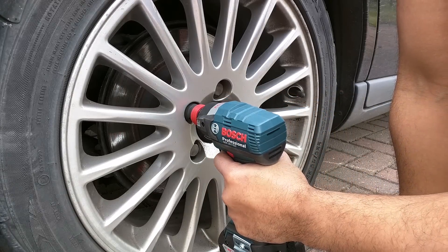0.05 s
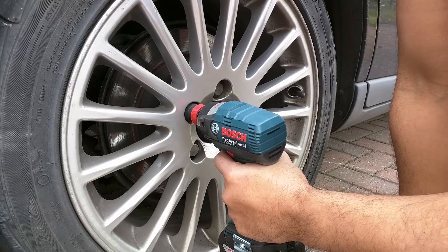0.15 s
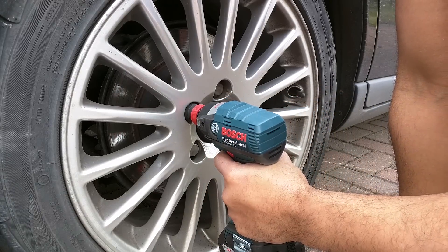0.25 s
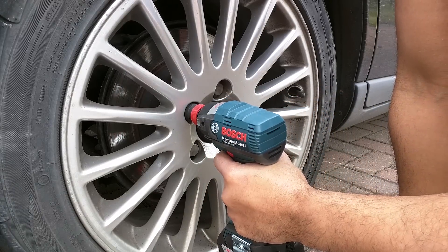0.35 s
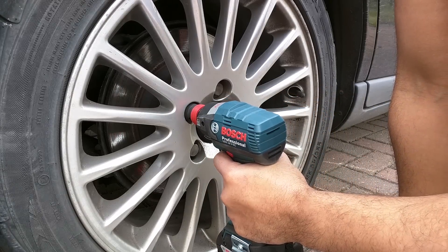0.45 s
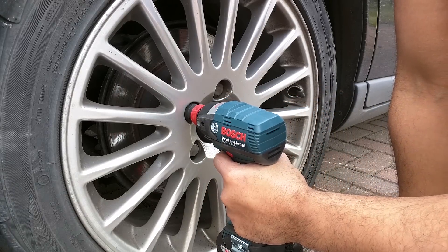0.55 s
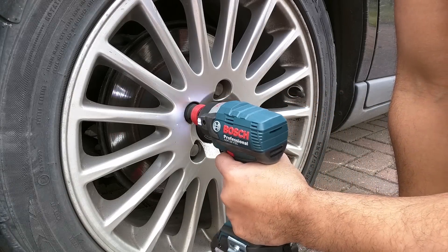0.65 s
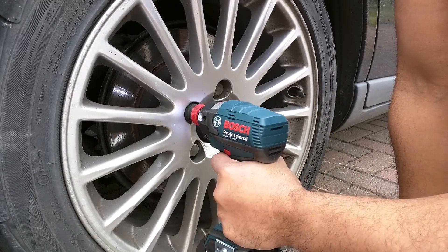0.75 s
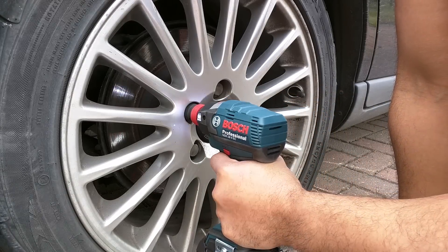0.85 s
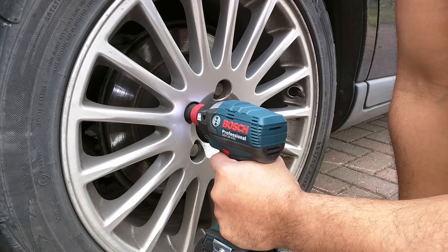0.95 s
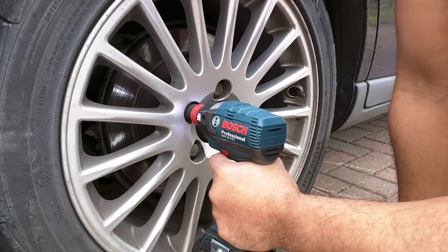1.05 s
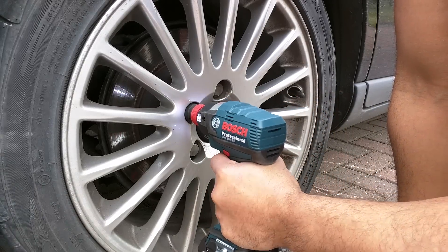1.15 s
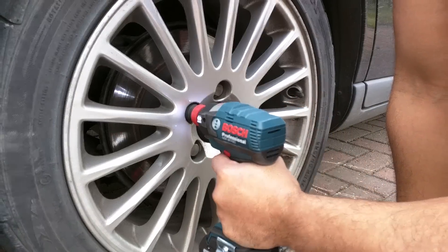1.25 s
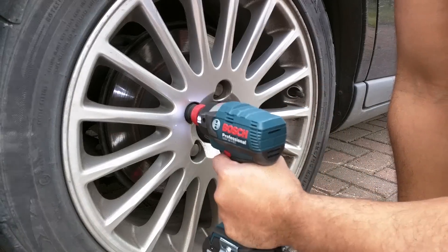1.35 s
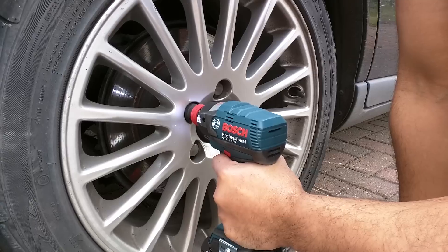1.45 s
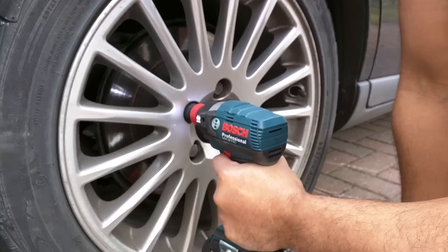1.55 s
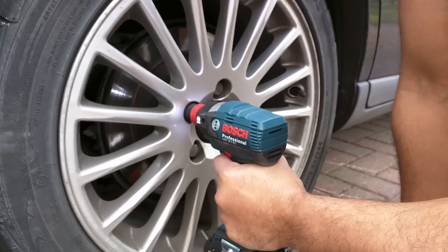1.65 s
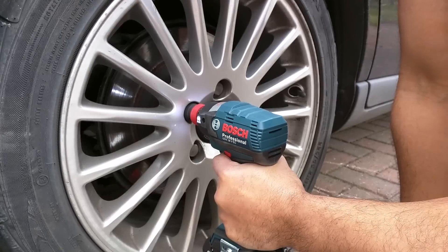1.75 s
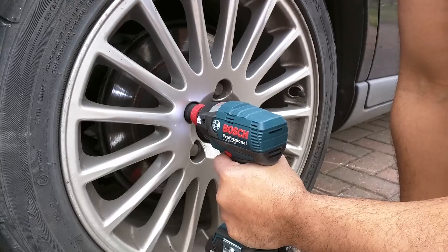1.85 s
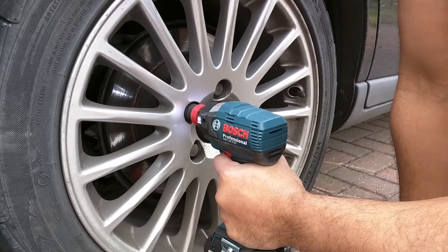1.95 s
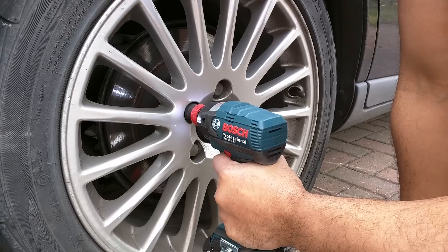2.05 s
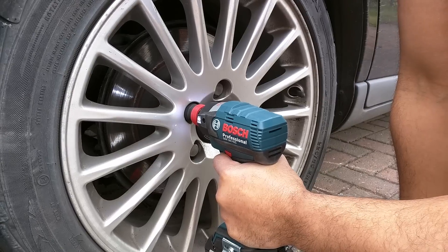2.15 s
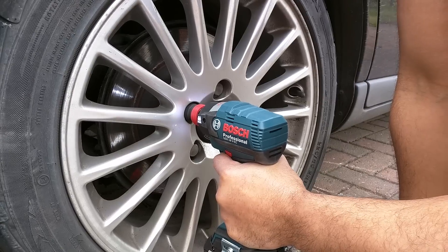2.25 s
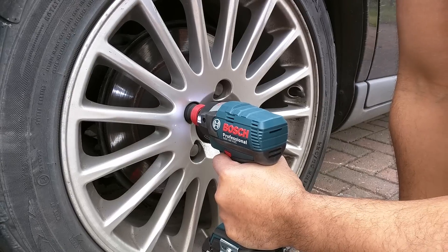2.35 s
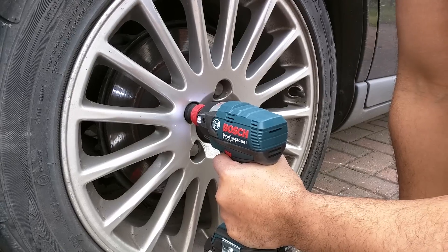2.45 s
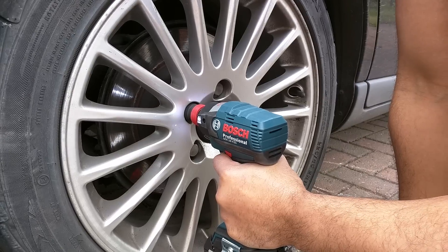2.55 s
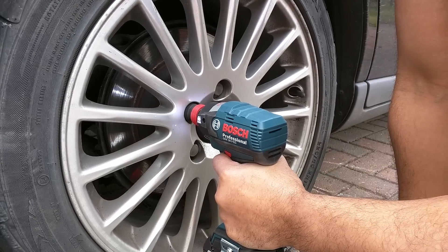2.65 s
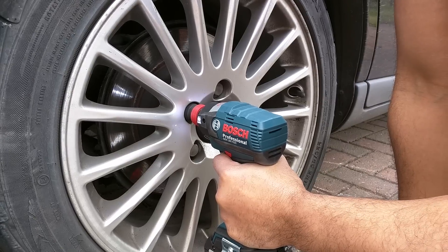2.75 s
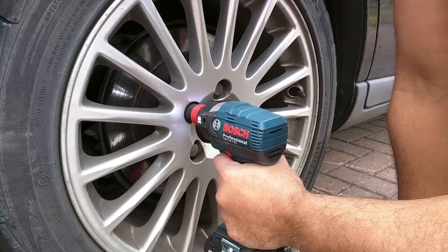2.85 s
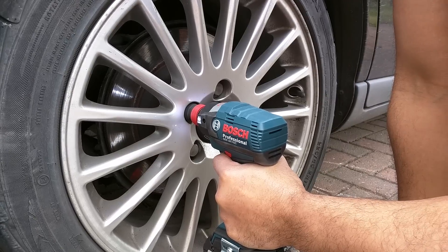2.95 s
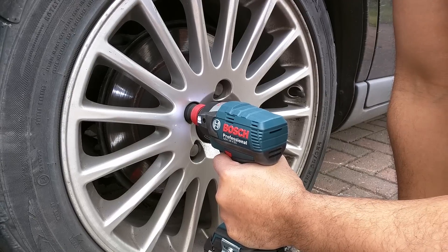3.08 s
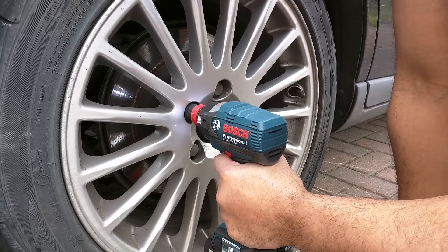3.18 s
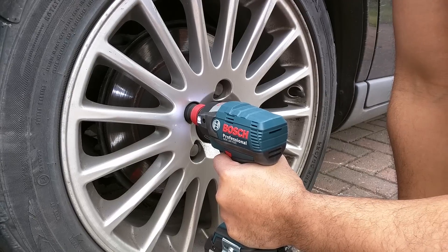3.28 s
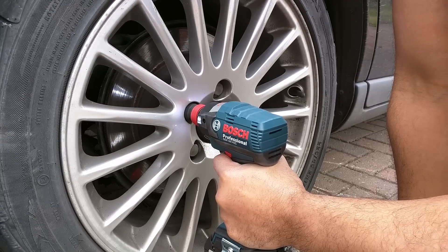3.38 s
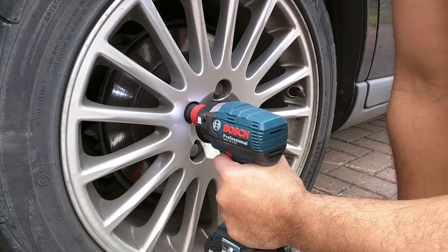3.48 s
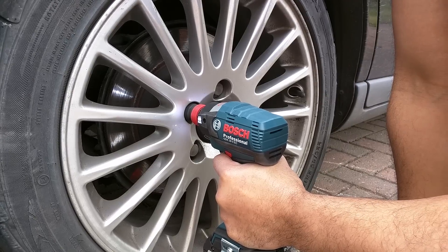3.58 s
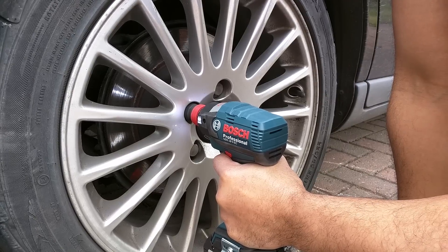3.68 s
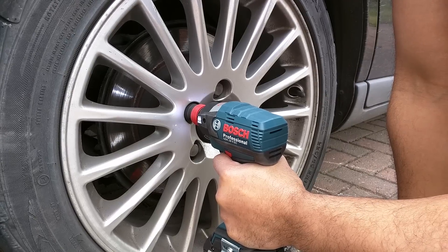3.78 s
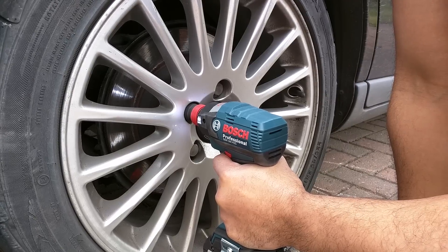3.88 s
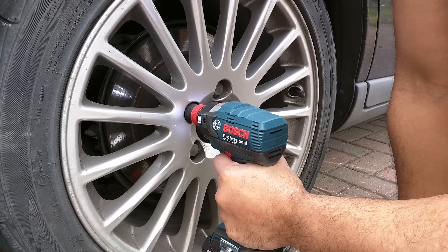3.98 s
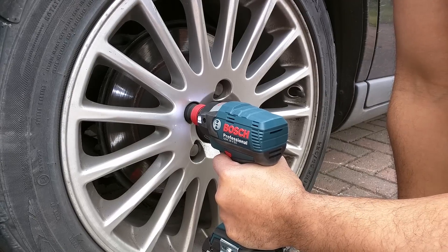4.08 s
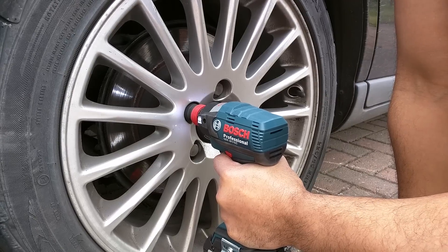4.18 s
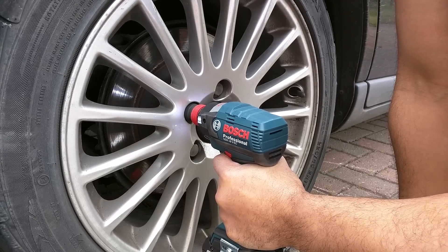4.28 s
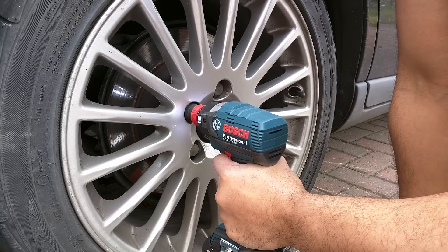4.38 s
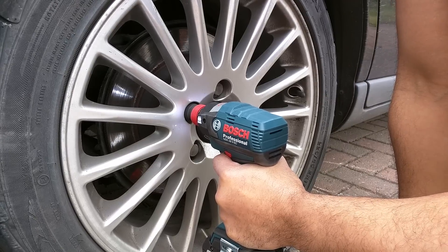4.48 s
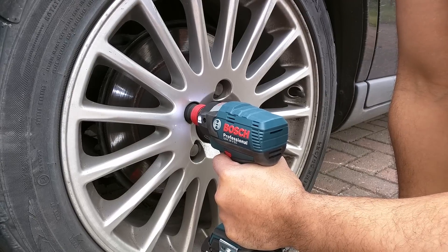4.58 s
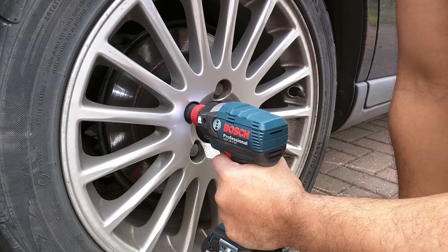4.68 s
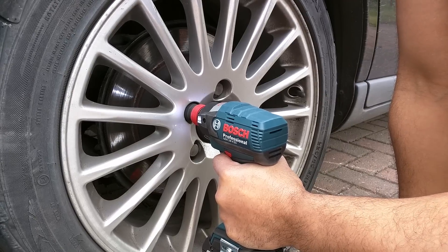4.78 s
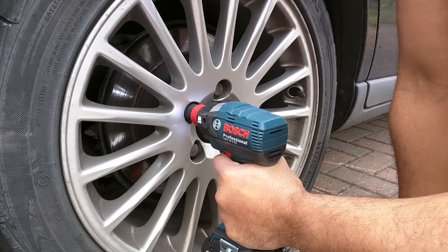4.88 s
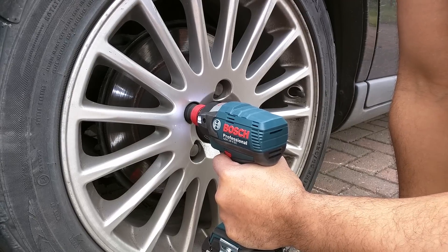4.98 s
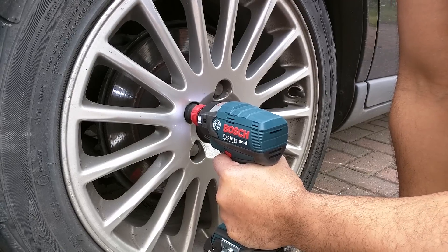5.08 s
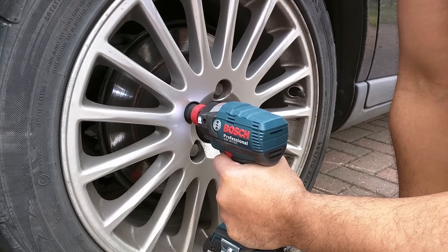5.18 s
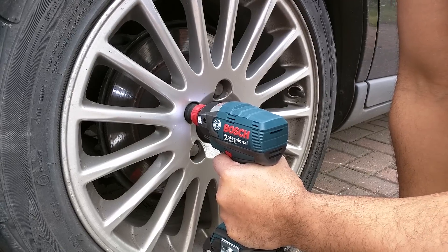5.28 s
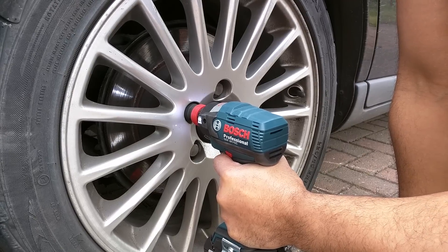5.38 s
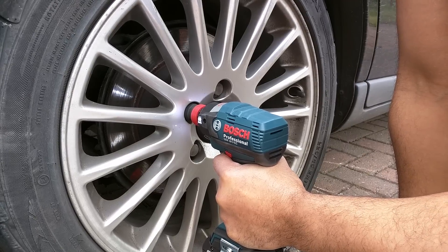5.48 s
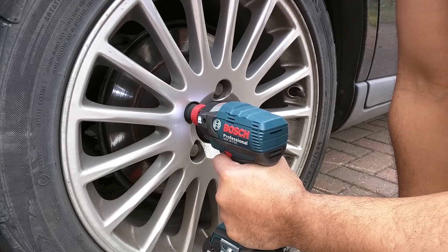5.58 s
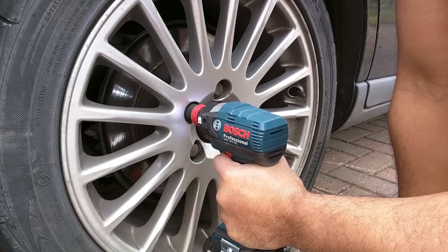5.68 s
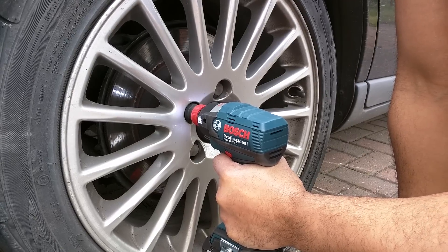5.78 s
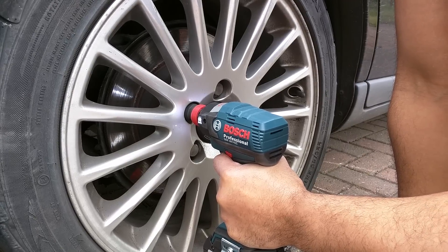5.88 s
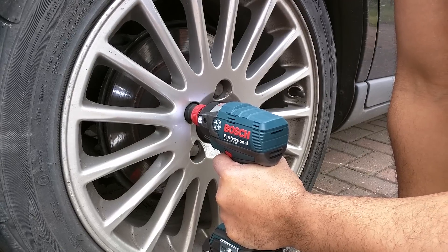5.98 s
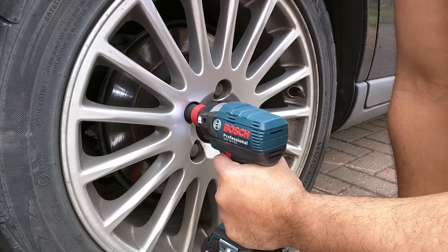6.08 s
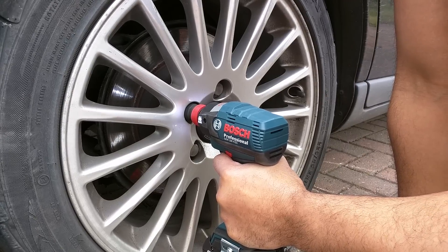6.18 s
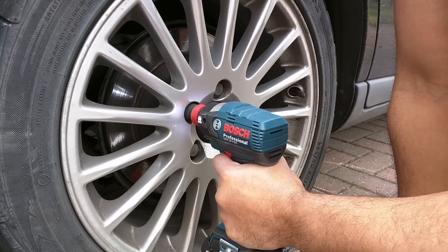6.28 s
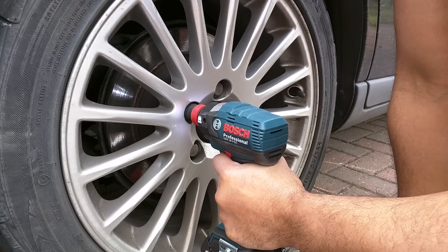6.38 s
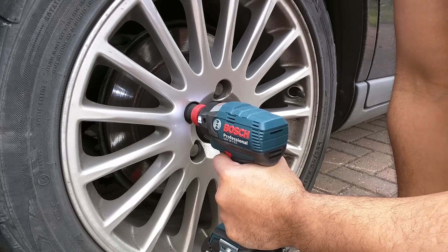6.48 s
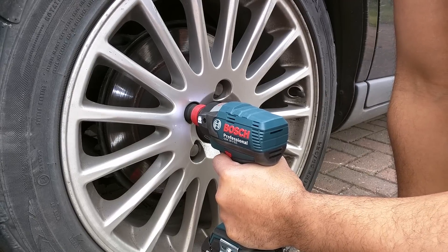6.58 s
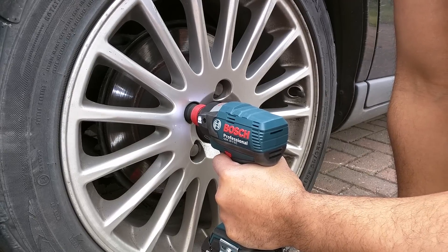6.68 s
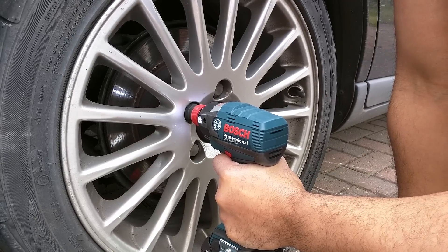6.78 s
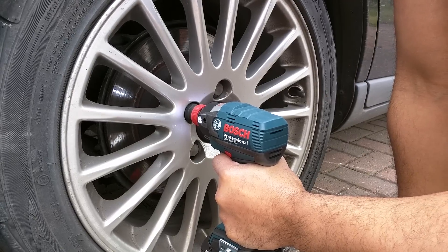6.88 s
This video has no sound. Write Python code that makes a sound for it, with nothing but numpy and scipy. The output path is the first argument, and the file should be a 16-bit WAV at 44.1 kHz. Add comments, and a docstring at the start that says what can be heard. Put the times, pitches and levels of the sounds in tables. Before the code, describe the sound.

A cordless impact wrench works on a stubborn car wheel bolt outdoors, heard from close by. First there is only a low gust of wind and a few very faint, thin whistles. The socket knocks as the motor engages, and rapid steel-on-steel hammering takes over, harsh and ringing. It holds steady to the end, with only slight shifts in tone.

```python
"""A cordless impact wrench hammers on a tight wheel bolt of a car, outdoors, close to the microphone.
The motor whirrs and the socket takes up its slack; then two hammer jaws hit the anvil in turn, about
68 blows a second. Each blow clashes in the socket, rings tool and alloy wheel and kicks the tool's body.
Wind rumbles on the microphone over soft distant noise, and a few faint thin whistles and a rustle
sound before the trigger is pulled."""
import sys
import numpy as np
from scipy import signal
from scipy.fft import rfft, irfft
from scipy.io import wavfile
from scipy.ndimage import uniform_filter1d

SR = 44100
rng = np.random.default_rng(int(sys.argv[2]) if len(sys.argv) > 2 else 0)


def unload_audio(sound):
    """Save the sound as a 16-bit wav file, at the path given as the first command line argument."""
    columns = np.transpose(np.atleast_2d(sound))
    # keep every value between -1 and 1, then stretch to whole-number steps
    steps = np.round(np.clip(columns, -1, 1) * 32767)
    wavfile.write(sys.argv[1], SR, steps.astype(np.int16))


N = 306054
TIME = np.arange(N) / SR
FFT_SIZE = 8192
BIN_HZ = np.maximum(np.arange(FFT_SIZE // 2 + 1) * SR / FFT_SIZE, 1)
HAMMER_START_S = .8105

# A small click as the trigger is pulled, then knocks as the drive engages and the socket takes up its slack. #
# Each row: start in seconds, relative level of the ring in dB, relative level of the dull knock in dB.
SLACK_KNOCKS = [(.7712, -18, -26), (.7872, 1, 0), (.7902, -.5, 0), (.8022, -3, 1)]


def wrench(jaw_share=.12, creep_db=-12.0, scrape_db=-13.0, scrape_lead_s=.0012, pressure_db=.25):
    """Close up, each blow sets off a repeating ring and a changing rattle through the same resonances."""
    # Broad colour of a blow. Each row: frequency in Hz, relative level in dB.
    blow_colour = [(130.0, -7.1), (330.0, -14.0), (550.0, -13.2), (1000.0, -7.0), (2050.0, -9.7),
                   (2900.0, -7.6), (4200.0, -6.4), (6500.0, -8.2), (8000.0, -5.3), (10500.0, 0.0),
                   (13000.0, -3.1), (15500.0, -5.4)]
    # Resonances of housing, wheel, socket and anvil. Each row: centre in Hz, width in Hz, height in dB.
    resonances = [(424, 120, 4.5), (702, 160, 5.3), (895, 57, 2.5), (1192, 80, 11), (1312, 100, 11),
                  (1444, 100, 9.3), (1871, 132, 2.3), (2245, 83, 3.5), (2492, 160, 7), (2654, 55, 7),
                  (2730, 90, 3.5), (3200, 130, 7.5), (3355, 85, 9), (3570, 463, 6.5), (4297, 40, 5),
                  (4700, 330, 4), (4791, 80, 5), (5076, 166, 2.5), (5764, 283, 3.5), (7243, 165, 3),
                  (7778, 45, 4), (8609, 130, 4.5), (9700, 300, 1.5), (9843, 60, 4.5), (10544, 130, 4),
                  (11130, 100, 4.5), (11510, 130, 3.5), (11680, 120, 2.5), (12272, 200, 2.2),
                  (13440, 220, 2.8)]
    # Share of the sound that changes from blow to blow. Each row: frequency in Hz, share in dB.
    looseness = [(130, -.6), (400, -1), (800, -4.2), (1300, -5.3), (3300, -6), (6000, -3.8), (11000, -2.6)]
    # Ringing parts: housing, wheel, socket, hammer and anvil. Each row: low and high edge in Hz,
    # level in dB, rise and decay in seconds, tail level in dB, tail decay in seconds,
    # dB gained per dB of jaw fullness.
    ringing_parts = [(170, 560, -44, .0015, .004, -16, .015, .9),
                     (560, 1750, -27.3, .001, .013, -7, .02, .3),
                     (1750, 6200, -21.5, .00012, .0043, -9.5, .015, 1.0),
                     (6200, 19000, -15.35, .00015, .0034, -18.5, .018, -.55)]
    times, jaw, fullness_db, strength = blows(jitter_s=.00008, lead_s_per_db=.00011, uneven_db=.42)
    slack_s, slack_db, _ = np.transpose(SLACK_KNOCKS)
    slack = clicks(slack_s, from_db(slack_db))
    loose_db = np.minimum(spectrum(looseness), -.1)
    firm_db = 10 * np.log10(1 - from_db(loose_db) ** 2)   # the rest of the power
    peaks_db = sum(db * .5 ** ((2 * (BIN_HZ - hz) / width) ** 2) for hz, width, db in resonances)
    body_db = spectrum(blow_colour) + peaks_db
    # the jaw scrapes onto the anvil just before it lands
    scrape_s = times - scrape_lead_s * rng.exponential(1, len(times))
    metal = 0
    for low, high, level_db, rise_s, decay_s, tail_db, tail_s, tilt in ringing_parts:
        envelope = blow_envelope(rise_s, decay_s, tail_db, tail_s)
        sizes = strength * from_db(tilt * fullness_db)
        hits = clicks(times, sizes) + slack
        # the two jaws share most of their ring; the rest swaps sign from one to the other
        alternating = clicks(times, sizes * (1 - 2 * jaw))
        firm = np.sqrt(1 - jaw_share) * convolve(hits, metal_ring(envelope))
        firm += np.sqrt(jaw_share) * convolve(alternating, metal_ring(envelope))
        # the ring shifts a little as the socket creeps on the bolt
        firm += from_db(creep_db) * drift(1.6) * convolve(hits, metal_ring(envelope))
        loose = rattle(hits + clicks(scrape_s, from_db(scrape_db) * sizes), envelope)
        band_db = body_db - 10 * np.log10((1 + (low / BIN_HZ) ** 10) * (1 + (BIN_HZ / high) ** 10))
        part = colour(firm, band_db + firm_db) + colour(loose, band_db + loose_db)
        metal += from_db(level_db) * unit_rms(part)
    _, clank_db, high_ring_db = socket_seat()
    metal = lift_band(metal, [3100, 3700], clank_db)
    metal = lift_band(metal, [8200, 9900], high_ring_db)
    # the hammer lands a little harder or softer as the hand's pressure wavers
    return from_db(pressure_db * drift(2.0)) * metal


def blows(jitter_s, lead_s_per_db, uneven_db):
    """The jaws land in turn, one fuller and earlier: times, jaw (0 or 1), fullness in dB, strength."""
    count, hammering = blow_count(), TIME >= HAMMER_START_S
    number = np.arange(int(count[-1]) + 1)
    times = np.interp(number, count[hammering], TIME[hammering])
    jaw = number % 2
    lean_db, clank_db, _ = (np.interp(times, TIME, db) for db in socket_seat())
    limp_db = lean_db * (1 - 2 * jaw)
    fullness_db = .25 * clank_db + limp_db   # the whole blow follows the clank a little
    timing, force = rng.standard_normal((len(times), 2)).T
    landing_s = times - lead_s_per_db * limp_db + jitter_s * timing
    return landing_s, jaw, fullness_db, from_db(uneven_db * force)


def blow_count(start_hz=67.814, top_hz=69.385, loaded_hz=66.814, at_speed_s=1.05, sag_s=5.0):
    """Running count of blows: the motor comes up to speed, then slowly sags under the load."""
    rise = np.interp(TIME, [HAMMER_START_S, at_speed_s], [start_hz, top_hz])
    sag = (top_hz - loaded_hz) * (1 - np.exp(-np.maximum(TIME - at_speed_s, 0) / sag_s))
    return np.cumsum((rise - sag) * (TIME >= HAMMER_START_S)) / SR


def socket_seat(shift_s=.3):
    """Jaw lean, clank and high ring in dB: each slides to a new value as the socket shifts on the bolt."""
    # Seats of the socket. Each row: middle of the shift in seconds, first jaw's fullness over the mean
    # in dB, lift of the clank in dB, lift of the high ring in dB.
    seats = [(1.0, .7, 1.5, .3), (2.55, -1.3, -.2, -.4), (4.7, -.4, -.3, -.2), (5.95, -.6, -.4, 1.8)]
    rows = np.array(seats)
    steps_db = np.diff(rows[:, 1:], axis=0, prepend=0)
    progress = np.clip((TIME - rows[:, :1]) / shift_s + .5, 0, 1)
    return steps_db.T @ progress


def blow_envelope(rise_s, decay_s, tail_db, tail_s):
    """One blow dies away, with a weak tail off wheel arch and paving; energy 1."""
    t = TIME[:SR // 16]
    decay = np.hypot(np.exp(-t / decay_s), from_db(tail_db) * np.exp(-t / tail_s))
    envelope = (1 - np.exp(-t / rise_s)) * decay
    return envelope / np.linalg.norm(envelope)


def metal_ring(envelope, passes=8):
    """A blow scatters along many paths through the metal: even in spectrum, following the envelope."""
    burst = rng.standard_normal(len(envelope)) * envelope
    for _ in range(passes):
        flat = irfft(np.exp(1j * np.angle(rfft(burst))), len(envelope))
        burst = flat * envelope / np.sqrt(uniform_filter1d(flat ** 2, size=64) + 1e-18)
    return burst / np.linalg.norm(burst)


def rattle(hits, envelope):
    """Steel chatters on steel after each hit, differently every time."""
    power = np.maximum(convolve(hits ** 2, envelope ** 2), 0)
    return rng.standard_normal(N) * np.sqrt(power)


def recoil(delay_blows=.19, waver_db=1.0, build_s=.25):
    """Every blow kicks the tool's body: a low buzz builds as hammering settles, limping with the jaws."""
    # Harmonics of the recoil. Each row: multiple of the blow rate, level in dB.
    harmonics = [(1, -58), (2, -43), (3, -44.8), (4, -51), (5, -51.5), (6, -45.5), (7, -51.5)]
    count = blow_count() - delay_blows
    settled = np.clip((TIME - HAMMER_START_S) / build_s, 0, 1)
    buzz = sum(from_db(db + waver_db * drift(16)) * np.cos(2 * np.pi * k * count) for k, db in harmonics)
    lean_db, _, _ = socket_seat()
    limp = from_db(1.7 * lean_db * np.cos(np.pi * count) + .9 * drift(60))
    return np.sqrt(2) * settled * limp * buzz


def motor_and_slack(start_s=.768, whirr_db=-34.0):
    """The trigger clicks, the motor starts and whirrs on; the loose socket knocks dully on the bolt as the
    drive engages."""
    knock_s, _, knock_db = np.transpose(SLACK_KNOCKS)
    envelope = blow_envelope(rise_s=.0006, decay_s=.005, tail_db=-20, tail_s=.012)
    knocks = rattle(clicks(knock_s, from_db(knock_db)), envelope)
    running = np.clip((TIME - start_s) / .006, 0, 1)
    whirr = from_db(whirr_db) * running * band_noise([700, 4200])
    return 5 * butter(knocks, [230, 1700], "band") + whirr


def wind(breeze_db=-52.5, turbulence_db=1.0, eddies_per_s=6.0, thump_s=.9435):
    """Wind on the microphone: low rumble from a light breeze and gusts, a few buffets, one soft thump."""
    # Colour of the rumble. Each row: frequency in Hz, relative level in dB.
    rumble_colour = [(10, -8), (25, -3), (42, 0), (65, -9), (130, -14), (250, -26), (600, -50), (2000, -90)]
    # Gusts on the microphone. Each row: start of the hold in seconds, hold in seconds, level in dB.
    gusts = [(0, .74, -34), (6.17, .68, -42)]
    # Brief buffets. Each row: middle in seconds, level in dB, frequency in Hz, half-width in seconds.
    buffets = [(.138, -27, 135, .011), (.49, -31, 45, .014), (6.22, -36, 80, .035)]
    power = from_db(breeze_db) ** 2 + sum((from_db(db) * gust(s, hold)) ** 2 for s, hold, db in gusts)
    flow = np.sqrt(power) * from_db(turbulence_db * drift(eddies_per_s))
    rumble = flow * coloured_noise(rumble_colour)
    for middle_s, db, hz, half_width_s in buffets:
        flutter = np.sqrt(2) * np.sin(2 * np.pi * hz * (TIME - middle_s) + drift(hz))
        rumble += from_db(db) * swell(middle_s, half_width_s) * flutter
    pressure_step = from_db(-14) * (TIME > thump_s)
    thump = butter(butter(pressure_step, 3.4, "high"), 260, "low")
    return rumble + thump


def gust(start_s, hold_s, attack_s=.05, release_s=.1):
    """A gust rises quickly, holds and dies away."""
    age = TIME - start_s
    return np.exp(np.minimum(age, 0) / attack_s - np.maximum(age - hold_s, 0) / release_s)


def outdoor_air(air_db=-43.6, waver_db=.6, whistle_width_hz=340, rustle_db=-62):
    """Soft noise from far off, with a few thin whistles and a faint rustle before the wrench starts."""
    # Colour of the outdoor background. Each row: frequency in Hz, relative level in dB.
    air_colour = [(100, -2), (300, -3), (1050, -7), (2000, -13), (3200, -18), (4500, -25), (7000, -30),
                  (11000, -33), (15500, -39)]
    # Thin whistles. Each row: middle in seconds, half-width in seconds, pitch in Hz, level in dB.
    whistles = [(.095, .019, 7720, -54), (.275, .02, 7680, -59), (.46, .035, 7540, -60),
                (.655, .016, 7620, -66), (.24, .06, 12450, -68), (.24, .07, 10900, -70)]
    air = from_db(air_db + waver_db * drift(6.0)) * coloured_noise(air_colour)
    for middle_s, half_width_s, hz, db in whistles:
        air += from_db(db) * swell(middle_s, half_width_s) * narrow_noise(hz, whistle_width_hz)
    rustle = from_db(rustle_db) * swell(middle_s=.25, half_width_s=.1) * band_noise([4000, 12000])
    return air + rustle


def from_db(db):
    """Decibels to gain."""
    return 10 ** (np.asarray(db) / 20)


def unit_rms(x):
    """The same signal at rms 1."""
    return x / np.sqrt(np.mean(x ** 2) + 1e-20)


def drift(rate):
    """Smooth random wander, about rate new values a second; rms 1."""
    knots = rng.standard_normal(int(rate * N / SR) + 2)
    smooth = signal.resample(knots, 8 * len(knots))
    return unit_rms(np.interp(np.arange(N), np.linspace(0, N, len(smooth)), smooth))


def swell(middle_s, half_width_s):
    """A bell-shaped rise and fall."""
    return np.exp(-np.minimum(((TIME - middle_s) / half_width_s) ** 2 / 2, 20))


def clicks(times, sizes):
    """One click of each size at each time."""
    return np.bincount(np.round(np.abs(times) * SR).astype(int), sizes, N)[:N]


def convolve(x, impulse):
    """A signal sounded through an impulse response."""
    return signal.oaconvolve(x, impulse)[:N]


def spectrum(points):
    """A level in dB at every bin, joining (Hz, dB) points on a log frequency axis."""
    hz, db = np.transpose(points)
    return np.interp(np.log(BIN_HZ), np.log(hz), db)


def colour(x, db):
    """Causal (minimum-phase) filter with the given gain at every bin."""
    cepstrum = irfft(np.log(from_db(db)))
    cepstrum[1:FFT_SIZE // 2] *= 2
    cepstrum[FFT_SIZE // 2 + 1:] = 0
    impulse = irfft(np.exp(rfft(cepstrum)))[:FFT_SIZE // 2]
    return convolve(x, impulse)


def butter(x, hz, kind, order=2):
    """Gentle low-, high- or band-pass."""
    return signal.sosfilt(signal.butter(order, hz, kind, fs=SR, output="sos"), x)


def lift_band(x, band_hz, db):
    """Raise or lower one band by a changing number of dB."""
    return x + (from_db(db) - 1) * butter(x, band_hz, "band", order=1)


def coloured_noise(points):
    """Noise shaped by (Hz, dB) points; rms 1."""
    return unit_rms(colour(rng.standard_normal(N), spectrum(points)))


def band_noise(band_hz):
    """Noise between two frequencies; rms 1."""
    return unit_rms(butter(rng.standard_normal(N), band_hz, "band"))


def narrow_noise(hz, width_hz):
    """Noise in a narrow band around one frequency; rms 1."""
    return np.sqrt(2) * drift(width_hz) * np.cos(2 * np.pi * hz * TIME)


def scene():
    """One microphone close to the wheel: the wrench at work, with wind and outdoor air around it."""
    return (wrench() + recoil() + motor_and_slack() + wind() + outdoor_air())[None]


def record(dry, ceiling=.74, cutoff_hz=15850):
    """The loudest peaks are rounded and the highest treble is cut."""
    low_pass = signal.firwin(401, cutoff_hz, fs=SR, window="blackman")
    heard = signal.oaconvolve(dry[0], low_pass, "same")
    rounded = ceiling * np.tanh(heard / ceiling)
    return signal.oaconvolve(rounded, low_pass, "same")[None]


dry = scene()
out = record(dry)
unload_audio(out)
```